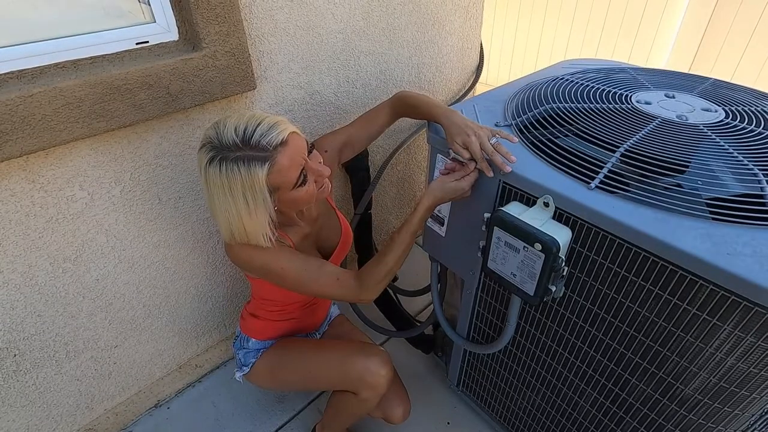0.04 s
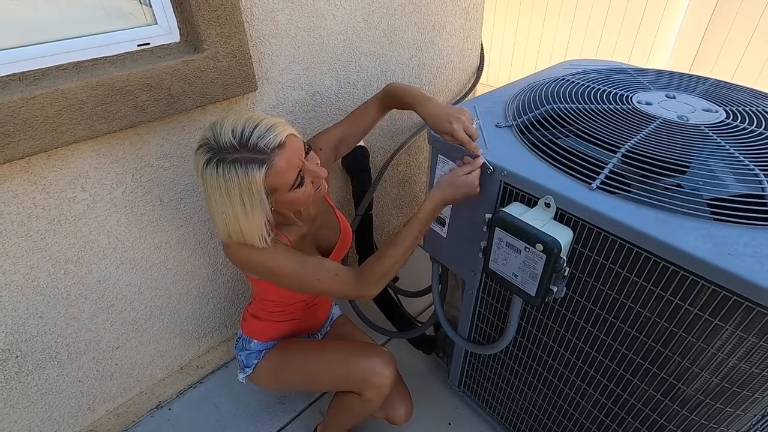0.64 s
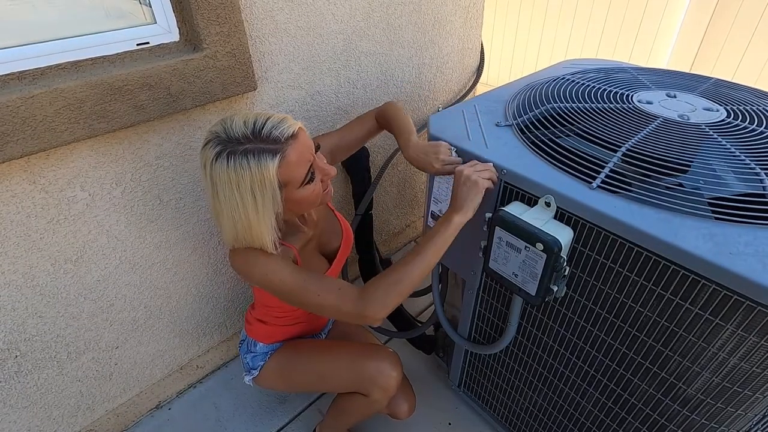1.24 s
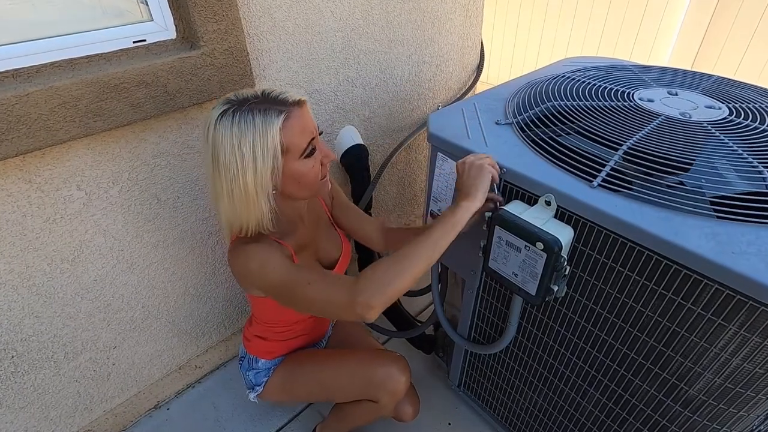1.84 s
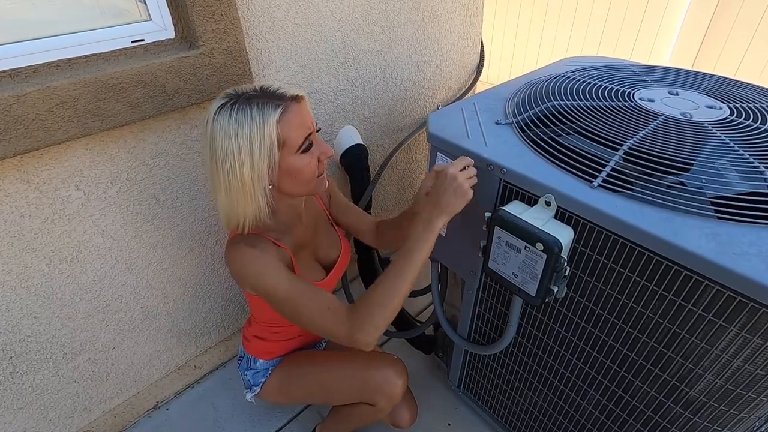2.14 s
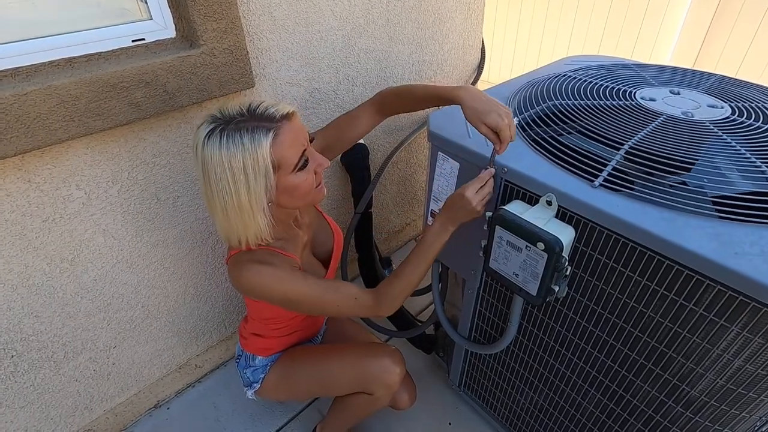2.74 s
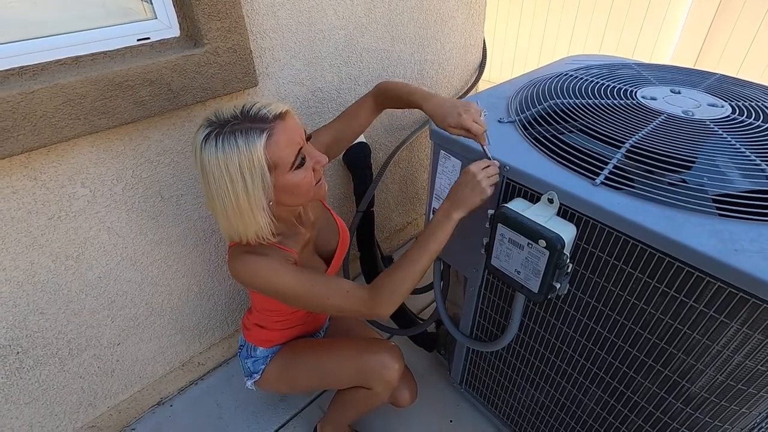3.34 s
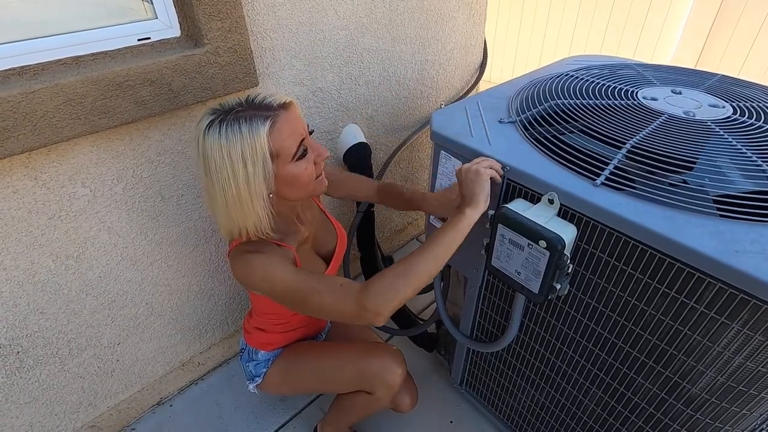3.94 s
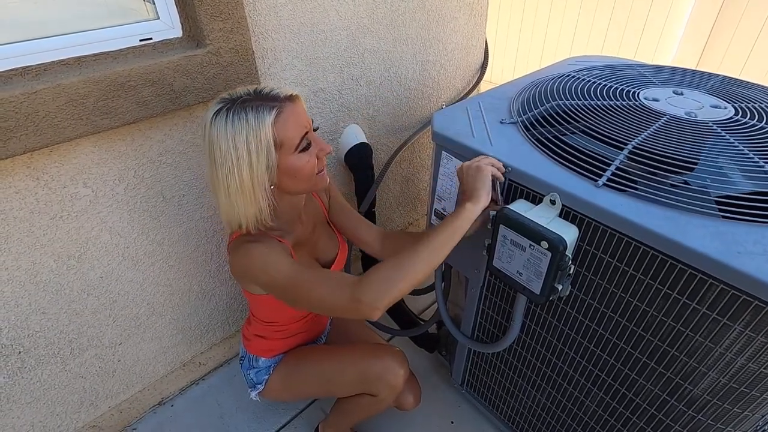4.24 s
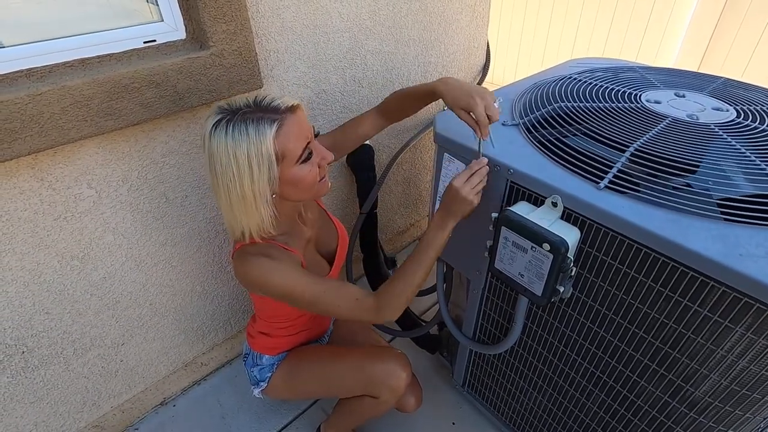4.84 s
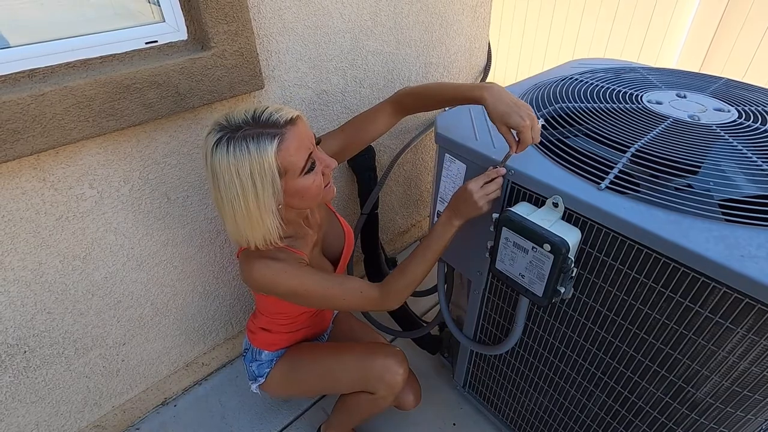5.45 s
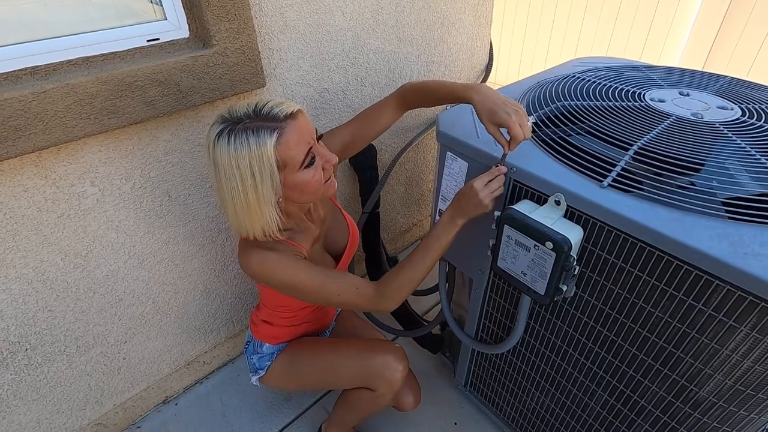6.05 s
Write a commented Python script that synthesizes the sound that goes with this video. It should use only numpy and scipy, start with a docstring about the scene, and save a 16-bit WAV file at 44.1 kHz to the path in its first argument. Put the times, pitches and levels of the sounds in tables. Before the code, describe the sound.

A small steel screwdriver taps, clinks and scrapes as screws are backed out of the sheet-metal panel of an idle outdoor cooling unit. The knocks come in uneven clusters and ring briefly. Midway, one deep thump shakes the close microphone, then sparser taps follow. Behind the work, traffic rumbles softly, a distant engine hums and fades early, and a very faint bird chirps twice.

```python
"""Knocks ring from the sheet-metal panel of an idle outdoor cooling unit beside a house wall, as its
screws are backed out. Each impact excites the cabinet's damped modes; a small steel driver clinks in
its own modes and scrapes by stick-slip friction, and fingers slide softly. Behind the work, traffic
rumbles, a distant engine hums and fades, and a far bird chirps twice. One deep thump shakes the
microphone."""
import sys
import numpy as np
from scipy import signal
from scipy.fft import rfft, irfft, next_fast_len
from scipy.io import wavfile
from scipy.ndimage import uniform_filter1d, map_coordinates

SR = 44100
rng = np.random.default_rng(int(sys.argv[2]) if len(sys.argv) > 2 else 0)


def waveform_to_disk(signal):
    """Save audio, clipped to [-1, 1], as 16-bit WAV at the path in sys.argv[1]."""
    frames = np.transpose(np.atleast_2d(signal))
    scaled = np.clip(frames, -1, 1) * 32767
    samples = np.round(scaled).astype(np.int16)
    wavfile.write(sys.argv[1], SR, samples)


N = 273420
TIME, RING_TIME = np.arange(N) / SR, np.arange(SR) / SR


def amp(db):
    return 10 ** (np.asarray(db) / 20)


def unit_rms(x):
    return x / np.sqrt(np.mean(x ** 2) + 1e-20)


def onset_rms(x, size=1100):
    return np.sqrt(np.mean(x[0, :size] ** 2) + 1e-20)


def value_at(points, hz):
    """Interpolation on a logarithmic frequency axis."""
    frequencies, values = np.transpose(points)
    return np.interp(np.log(hz + 1), np.log(frequencies + 1), values)


def add(mix, start, sound):
    part = mix[:, max(round(start * SR), 0):][:, :sound.shape[1]]
    part += sound[:, :part.shape[1]]


def colour(x, points):
    """Zero-phase filtering by a curve of (Hz, dB) points."""
    size = next_fast_len(x.shape[-1] + 4096)
    gain = amp(value_at(points, np.fft.rfftfreq(size, 1 / SR)))
    return irfft(rfft(x, size) * gain, size)[..., :x.shape[-1]]


def noise(spectrum, size):
    """Uncorrelated mid and side noise of one spectrum."""
    return unit_rms(colour(rng.standard_normal((2, size)), spectrum))


def gesture(start, length, attack_s, fall_db_per_s, release_s):
    """An envelope of linear rise, exponential decay and linear release."""
    t = TIME - start
    fall = amp(-fall_db_per_s * np.clip(t - attack_s, 0, length))
    return np.clip(t / attack_s, 0, 1) * fall * np.clip((length - t) / release_s, 0, 1)


# Spectrum of the outdoor air. Each row: frequency in Hz, relative level in dB.
AIR_SPECTRUM = [(12, -37), (20, -4), (70, 2), (108, -21.5), (143, -17.5), (211, -16.5), (263, -27),
                (457, -28), (571, -28.5), (841, -30), (1270, -30), (1590, -34.5), (2040, -38.5),
                (2480, -44), (15000, -69)]

def air(level_db=-51.5):
    """Quiet outdoor air is stationary noise, strongest in the bass."""
    return amp(level_db) * noise(AIR_SPECTRUM, N)


# Spectrum of far traffic. Each row: frequency in Hz, relative level in dB.
TRAFFIC_SPECTRUM = [(40, -15), (85, -2), (110, -3), (135, 2.5), (170, -3.5), (210, -1.5), (270, -21),
                    (450, -27.5), (1500, -78.5)]
# Its swells. Each row: centre in seconds, half-width in seconds, lift in dB.
TRAFFIC_SWELLS = [(2.748, 0.35, 7), (4.356, 0.081, 6.5), (5.766, 0.12, 6)]

def traffic(start_db=-50, fall_db_per_s=3, rest_db=-60, drift_db=2.96):
    """Amplitude-modulated noise: far traffic recedes to a low rumble that drifts and swells."""
    drift = unit_rms(sum(np.sin(2 * np.pi * (hz * TIME + rng.random())) for hz in np.geomspace(1, 5, 12)))
    level_db = np.maximum(start_db - fall_db_per_s * TIME, rest_db) + drift_db * drift
    level_db += sum(lift * np.exp(-((TIME - centre) / half) ** 2) for centre, half, lift in TRAFFIC_SWELLS)
    return amp(level_db) * noise(TRAFFIC_SPECTRUM, N)


# Exhaust harmonics. Each row: time in seconds, relative levels of the first and second in dB.
EXHAUST_LEVELS = [(0.0, -44, -35.5), (0.12, -39.5, -41), (0.28, -44, -38.5), (0.69, -41.5, -57),
                  (0.87, -47.5, -43.5), (1.59, -47.5, -46.5), (1.74, -56, -53), (2.0, -39, -54)]
# A fainter hum. Each row: frequency in Hz, starting level in dB, decay in dB per second.
FAINT_HUM = [(84, -46.5, 6.5), (170, -55, 4)]

def engine(firing_hz=66.7, waver_hz=0.93, second_trim_db=-1, end_s=2.052, fade_s=0.12):
    """Periodic exhaust pulses give harmonics of the firing rate; a fainter hum wavers with them."""
    times, first_db, second_db = np.transpose(EXHAUST_LEVELS)
    waver = unit_rms(colour(rng.standard_normal(N), [(6, -16), (20, -29), (60, -100)]))
    phase = 2 * np.pi * np.cumsum(firing_hz + waver_hz * waver) / SR
    hum = amp(np.interp(TIME, times, first_db)) * np.sin(phase)
    hum += amp(second_trim_db + np.interp(TIME, times, second_db)) * np.sin(2 * phase)
    hum += sum(amp(db - fall * TIME) * np.sin(phase * hz / firing_hz) for hz, db, fall in FAINT_HUM)
    return np.sqrt(2) * hum * np.clip((end_s - TIME) / fade_s, 0, 1)


# Bird calls. Each row: start, length and time to the lowest note in seconds, level in dB.
BIRD_CHIRPS = [(0.817, 0.075, 0.038, -80), (4.067, 0.064, 0.055, -70.5)]

def bird(low_hz=3570, swing_hz=984, swing_s=0.057, echo_db=-3, echo_t60=0.13):
    """Frequency-modulated whistles swoop to one low note, smeared by reverberation between walls."""
    out = np.zeros((2, N))
    for start, length, lowest_s, db in BIRD_CHIRPS:
        t = np.arange(0, length, 1 / SR)
        hz = low_hz + swing_hz * np.sin(np.pi * (t - lowest_s) / swing_s) ** 2
        whistle = amp(db) * np.sin(2 * np.pi * np.cumsum(hz) / SR) * signal.windows.tukey(len(t), .5)
        walls = rng.standard_normal((2, SR)) * amp(-60 * RING_TIME / echo_t60)
        echo = signal.fftconvolve(whistle[None], walls / np.linalg.norm(walls[0]), axes=1)
        add(out, start, np.outer([1, .5], whistle))
        add(out, start, amp(echo_db) * echo)
    return out


# The thump and a faint shake after it. Each row: start in seconds, length in seconds, level in dB.
MICROPHONE_SHAKES = [(3.093, 0.178, -17.5), (3.503, 0.179, -38.5)]

def thump(start_hz=32.3, sag_hz_per_s=46.6, rustle_db=-21):
    """A damped oscillation: a few deep swings slow as they die, carrying a dull rustle."""
    spectrum = [(20, -22), (60, 2.5), (110, -15), (220, -25), (500, -24.5), (1500, -45), (5000, -59)]
    rustle = amp(rustle_db) * noise(spectrum, N)[0]
    out = np.zeros(N)
    for start, length, db in MICROPHONE_SHAKES:
        t = np.clip(TIME - start, 0, length)
        swing = np.sqrt(2) * np.sin(2 * np.pi * (start_hz - sag_hz_per_s * t / 2) * t)
        envelope = gesture(start, length, attack_s=.032, fall_db_per_s=78, release_s=.014)
        out += amp(db) * envelope * (swing + rustle)
    return out


# Finger strokes. Each row: start in seconds, length in seconds, relative level in dB.
FINGER_STROKES = [(3.987, 0.49, -73), (4.424, 0.34, -69), (4.719, 0.61, -79), (5.005, 0.39, -82.5)]
# Spectrum of sliding skin. Each row: frequency in Hz, relative level in dB.
SKIN_SPECTRUM = [(800, -19.5), (2000, 1.5), (3200, -2.5), (6000, -8.5), (9000, -18), (14000, -34)]

def fingers(gain_db=1, grain=0.19):
    """Sliding friction of skin on tool and paint hisses as the loosened screw is spun out."""
    strokes = sum(amp(db) * gesture(start, length, attack_s=.048, fall_db_per_s=19, release_s=.21)
                  for start, length, db in FINGER_STROKES)
    grip = 1 + grain * unit_rms(uniform_filter1d(rng.standard_normal(N), 200))
    return amp(gain_db) * noise(SKIN_SPECTRUM, N) * grip * strokes


# Damping of the brief and the lingering modes. Each row: frequency in Hz, 60 dB decay time in seconds.
SHORT_DECAY = [(300, 0.14), (1100, 0.31), (2600, 0.13), (5000, 0.18), (9000, 0.082), (14000, 0.13)]
LONG_DECAY = [(300, 1), (1100, 1), (2600, 0.95), (5000, 0.51), (12000, 0.52)]
# Share of the lingering modes. Each row: frequency in Hz, relative level in dB.
LINGERING_SHARE = [(300, -2.5), (600, -2.5), (1100, 0.5), (1900, -14), (2600, -13.5), (5000, -14.5),
                   (12000, -22)]

def dense_ring(spectrum, long_db):
    """Overlapping modes act as decaying noise: most die fast, some linger in the cabinet and yard."""
    hz, t, spectrogram = signal.stft(noise(spectrum, SR), SR, nperseg=256)
    hz = hz[:, None]
    short = amp(-60 * t / value_at(SHORT_DECAY, hz))
    long = amp(value_at(LINGERING_SHARE, hz) + long_db - 60 * t / value_at(LONG_DECAY, hz))
    ring = signal.istft(spectrogram * np.hypot(short, long), SR, nperseg=256)[1][:, :SR]
    # each point of contact feeds some groups of modes and starves others
    group_hz = np.cumsum(np.geomspace(45, 260, 130))
    ring = colour(ring, np.c_[group_hz, 3.5 * rng.standard_normal(len(group_hz))])
    return ring / onset_rms(ring)


def modal_ring(modes, scatter_db, max_t60):
    """Superposed damped sinusoids, weighted anew at each blow; the hand limits their decay time."""
    hz, db, t60 = np.transpose(modes)
    damping = np.log(1000) / np.clip(t60, .02, max_t60)
    waves = np.exp((2j * np.pi * hz - damping)[:, None] * RING_TIME)
    weights = amp(db + scatter_db * rng.standard_normal((2, len(hz))))
    phasors = np.exp(2j * np.pi * rng.random((2, len(hz))))
    ring = ((weights * phasors) @ waves).real
    return ring / onset_rms(ring)


def resonate(ring, hz, lift_db, q=18):
    """A resonant filter lifts one frequency of the struck metal."""
    return ring + (amp(lift_db) - 1) * signal.lfilter(*signal.iirpeak(hz, q, SR), ring)


def impact(crack, crack_s=.002, rise_s=.005):
    """The onset transient: a first crack, then vibration spreading through the metal."""
    return 1 - np.exp(-RING_TIME / rise_s) + crack * np.exp(-RING_TIME / crack_s)


# The panel's clear modes. Each row: frequency in Hz, relative level in dB, 60 dB decay time in seconds.
PANEL_MODES = [(352, -5, 0.4), (609.4, -9, 0.34), (789.3, 11, 0.1), (809, -7, 0.42), (877, -5.5, .6),
               (1019, -2, 0.49), (1033, -1.5, 0.41), (1098, -4, 0.6), (1327, 6, 0.19), (1327, -8.5, 0.27),
               (1381, 2, 0.45), (1450, 1, 0.35), (1853, -14.5, 0.53), (2170, -13, 0.4), (2430, -5.5, 0.26),
               (2630, -7, 0.33), (2870, -21, 0.27), (2970, -10, 0.16), (3770, -11.5, 0.27),
               (4130, -3.5, 0.072)]
# The cabinet's crowd of weaker modes. Each row: frequency in Hz, relative level in dB.
CABINET_SPECTRUM = [(150, -11.5), (240, -7), (350, -10.5), (500, -14.5), (760, -9.5), (1380, -5.5),
                    (1700, -7.5), (2100, -9), (2800, -7.5), (4200, -20.5), (7400, -33.5), (8700, -29),
                    (11000, -39.5), (15000, -60)]

def panel_ring(long_db, modes_db, scatter_db, max_t60):
    """The impulse response of the sheet metal is the sum of its dense and its clear modes."""
    dense = dense_ring(CABINET_SPECTRUM, long_db)
    return dense + amp(modes_db) * modal_ring(PANEL_MODES, scatter_db, max_t60)


# Driver strokes. Each row: start and length in seconds, level in dB, treble tilt in dB per octave.
SCRAPE_STROKES = [(0.105, 0.1, -43, 4), (0.695, 0.11, -62.5, -8), (1.891, 0.1, -51.5, -0.5),
                  (2.834, .10, -44.5, 3.5), (2.90, 0.12, -54.5, 4.5), (3.517, 0.08, -65.5, -0.5),
                  (4.125, 0.084, -65, -37), (4.342, 0.12, -68, -24), (5.201, 0.14, -51.5, 4),
                  (5.282, 0.083, -47, -2.5), (5.838, .055, -41, -7)]
# Colour of metal rubbing metal. Each row: frequency in Hz, relative gain in dB.
SCRAPE_FILTER = [(300, -10.5), (600, -10.5), (780, 1.5), (1000, 2.5), (1400, 0), (1750, 1), (2500, 1),
                 (12000, -5)]

def scrapes(slips_per_s=500, spread_db=3):
    """Stick-slip friction: a swell of tiny uneven impulses drives the panel."""
    out = np.zeros((2, N))
    for start, length, db, tilt_db in SCRAPE_STROKES:
        size = int(length * SR)
        slipping = rng.random(SR)[:size] < slips_per_s / SR
        force = amp(spread_db * np.minimum(rng.exponential(1, SR)[:size], 3))
        slips = slipping * force * np.hanning(size)
        ring = panel_ring(long_db=-6.5, modes_db=0, scatter_db=2.5, max_t60=.35)
        stroke = colour(signal.fftconvolve(slips[None], ring, axes=1), SCRAPE_FILTER)
        stroke = colour(stroke, [(1500, 0), (12000, 3 * tilt_db)])  # three octaves
        add(out, start, amp(db) * stroke / onset_rms(stroke, size))
    return out


# The driver's modes. Each row: frequency in Hz, relative level in dB, 60 dB decay time in seconds.
DRIVER_MODES = [(2528, 3, .2), (2674, 4, .26), (3206, -6, .15), (4030, -2, .17), (6285, -11, .16),
                (6600, -14, .12), (8260, -20, .1), (9610, -19, .08), (12680, -24, .07)]
# Its rattle in the socket. Each row: frequency in Hz, relative level in dB.
RATTLE_SPECTRUM = [(900, -25), (1900, -11), (2550, -7), (3150, -9.5), (3600, -15), (4050, -17),
                   (4700, -19.5), (5800, -19), (6400, -20.5), (7300, -27), (9300, -18.5), (11000, -39),
                   (12700, -28.5), (15000, -43)]
# Its touches on a screw. Each row: start in seconds, strength in dB, relative treble in dB,
# point of contact from 0 at the tip to 1 on the shaft.
DRIVER_TOUCHES = [(0.279, -45, -9, 1), (1.008, -47, -14, 0.029), (1.119, -49, -13.5, 0.86),
                  (1.132, -54.5, -3, 0.6), (1.198, -74, -5, 0.89), (1.279, -50, -23, 0.03),
                  (1.416, -60.5, -12.5, 1), (1.555, -61.5, 2, 0.4), (1.625, -36.5, -9.5, 0.3),
                  (2.822, -44, 1, 0.98), (2.937, -44, -15, 0.91), (3.151, -40, -17, 0.028),
                  (3.208, -45, -21, 0.11), (3.228, -53.5, -10, 0.025), (3.466, -65, -20, 0.92),
                  (5.833, -49, 10, 0.97)]

def clinks(gain_db=-8.5, usual_treble_db=-15, firm_db=-36):
    """Free vibration of the steel driver, ringing higher when touched farther up the shaft."""
    out = np.zeros((2, N))
    for start, strength_db, treble_db, place in DRIVER_TOUCHES:
        # a light touch stays in contact and is muffled; a firm one rebounds and rings clear
        clear_db = 3 + 2.76 * (strength_db - firm_db)
        clear = amp(clear_db) * modal_ring(DRIVER_MODES, scatter_db=8, max_t60=.3)
        rattle = dense_ring(RATTLE_SPECTRUM, long_db=3.5)
        rattle = resonate(rattle, hz=np.interp(place, (0, 1), (2420, 3250)), lift_db=5)
        rattle = resonate(rattle, hz=np.interp(place, (0, 1), (6280, 8500)), lift_db=9)
        shelf = [(4500, 0), (7000, treble_db - usual_treble_db)]
        ring = colour(rattle / onset_rms(rattle) + clear, shelf) * impact(crack=.15)
        add(out, start, amp(strength_db + gain_db) * ring / onset_rms(ring))
    return out


# Edges of the bands that shape a knock, in Hz.
KNOCK_BAND_EDGES = (250, 700, 1800, 4000, 8000, 15000)
# Spectrum of a knock of middling hardness. Each row: frequency in Hz, relative level in dB.
KNOCK_SPECTRUM = [(1100, -12), (2700, -14.5), (5700, -20.5), (11000, -32)]
# Knocks. Each row: start in seconds, strength in dB, relative body below 700 Hz in dB, hardness as
# treble tilt in dB per octave, lingering ring in dB, resonance favoured at that spot in Hz.
PANEL_KNOCKS = [(0.003, -36, -24, -0.5, 5.5, 1200), (0.145, -45, -42, 4, 12, 1430),
                (0.168, -28, -29, 0.4, 7, 1120), (0.281, -26.5, -26, 3, -1, 2885),
                (0.665, -43.5, -12, -0.5, 8, 1100), (0.695, -36, -26, -3, -7, 1370),
                (1.291, -53.5, 9.5, 6, -6, 640), (1.503, -54.5, -3, 3.5, 8, 372),
                (1.72, -25.5, -13.5, 1, -12, 1270), (1.808, -31, -14, -4.5, -23, 367),
                (1.911, -39, -12, -3.5, -17, 1270), (1.961, -31, -19, -3.5, -4.5, 1290),
                (2.821, -26.5, -21.5, 2, -3.5, 1413), (2.938, -32, -23, 2, -2.5, 1063),
                (2.974, -28, -27.5, -10, 2, 824), (3.286, -26, -18, -4.5, -7, 360),
                (3.842, -52.5, -8.5, -1, -3, 1085), (3.982, -51, -10, -2, -5, 1065),
                (4.233, -28.5, -13, 0.54, -5.5, 624), (4.318, -37.5, -29, -1.5, 10, 1510),
                (4.36, -41, -17.5, -0.5, 0, 1326), (5.183, -33.5, -28.5, 1.25, 5.5, 1005),
                (5.3, -30.5, -45, 1, -3.5, 1480), (5.31, -56, 2.5, 5, 12, 1340),
                (5.833, -24.5, -17.5, 2, -1.5, 1052)]

def knocks(gain_db=-3):
    """Impact excitation: the panel's spectrum depends on how hard and where the tool lands."""
    out, edges = np.zeros((2, N)), np.array(KNOCK_BAND_EDGES)
    bands = [signal.butter(3, pair, "band", fs=SR, output="sos") for pair in zip(edges[:-1], edges[1:])]
    centres = np.sqrt(edges[:-1] * edges[1:])
    for start, strength_db, body_db, tilt_db, long_db, spot_hz in PANEL_KNOCKS:
        ring = panel_ring(long_db, modes_db=min(long_db, 3) / 2 - 1.5, scatter_db=3, max_t60=.94)
        ring = resonate(ring, spot_hz, lift_db=11.5, q=25) * impact(crack=.2)
        natural_db = 20 * np.log10([onset_rms(signal.sosfilt(band, ring)) for band in bands])
        treble_db = value_at(KNOCK_SPECTRUM, centres[1:]) + tilt_db * np.log2(centres[1:] / centres[1])
        band_gain_db = np.r_[body_db, treble_db] - natural_db
        add(out, start, amp(strength_db + gain_db) * colour(ring, np.c_[centres, band_gain_db]))
    return out


# Stereo width. Each row: frequency in Hz, gain of the side signal in dB.
SIDE_GAIN = [(100, -28), (500, -19), (1000, -16), (2500, -15), (5000, -12), (9000, -11), (13000, -8)]

def scene():
    """Superposition at two close microphone ports, which hear nearly the same sound."""
    mid, side = knocks() + clinks() + scrapes() + fingers() + bird() + traffic() + air()
    shake = thump()
    mid = mid + engine() + shake
    side = colour(side, SIDE_GAIN) + amp(-23.5) * shake
    lag_samples = .05 + .27 * TIME  # the left port hears the work later as it drifts to the right
    left = map_coordinates(mid + side, [np.arange(N) - lag_samples], order=5, mode="nearest")
    return np.array([left, mid - side])


# Response of the slightly duller left port. Each row: frequency in Hz, gain in dB.
LEFT_RESPONSE = [(250, 0), (1100, -.8), (2500, 0), (8500, 0), (12500, -4)]

def record(dry, cutoff_hz=15600):
    """Linear filtering: the microphone's frequency response, then a low-pass band limit."""
    ports = np.array([colour(dry[0], LEFT_RESPONSE), dry[1]])
    low_pass = signal.firwin(511, cutoff_hz, window=("kaiser", 9), fs=SR)
    return signal.oaconvolve(ports, low_pass[None], "same")


dry = scene()
out = record(dry)
waveform_to_disk(out)
```